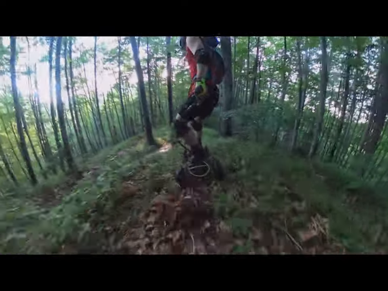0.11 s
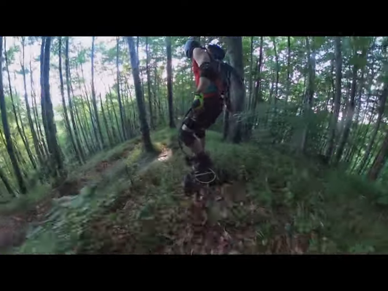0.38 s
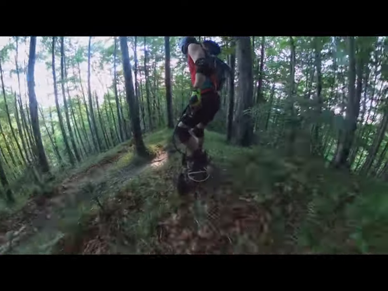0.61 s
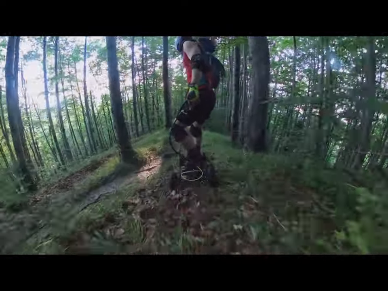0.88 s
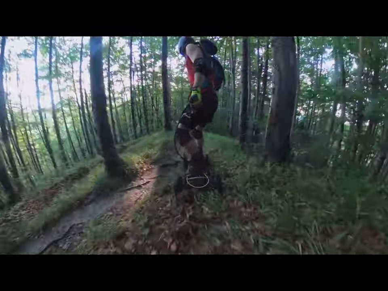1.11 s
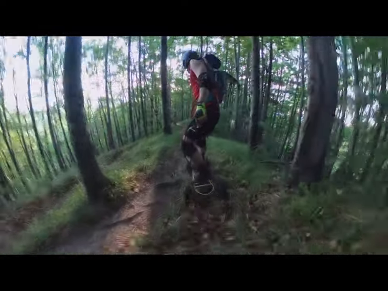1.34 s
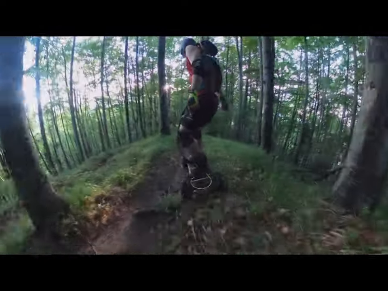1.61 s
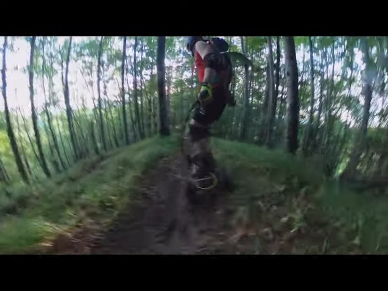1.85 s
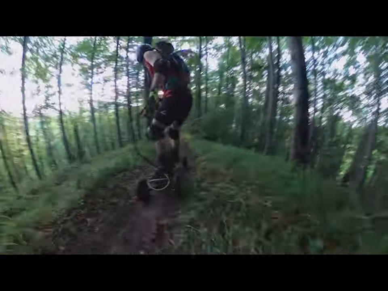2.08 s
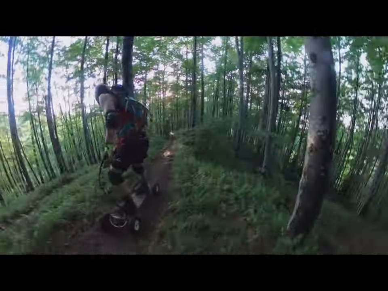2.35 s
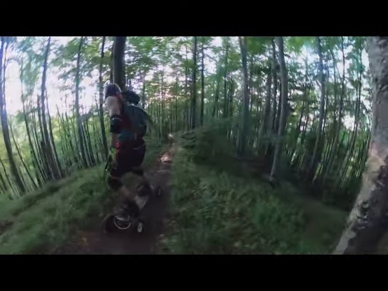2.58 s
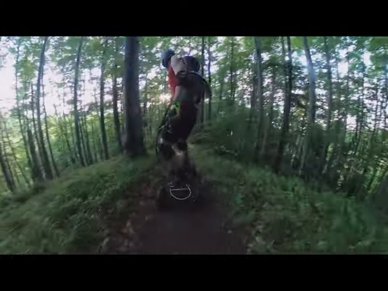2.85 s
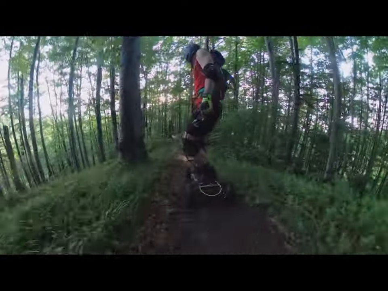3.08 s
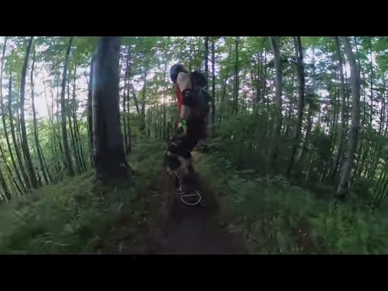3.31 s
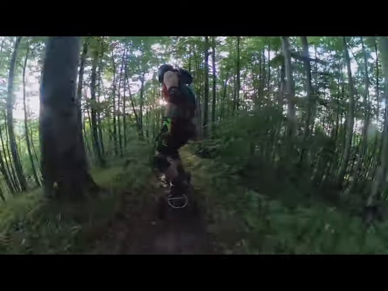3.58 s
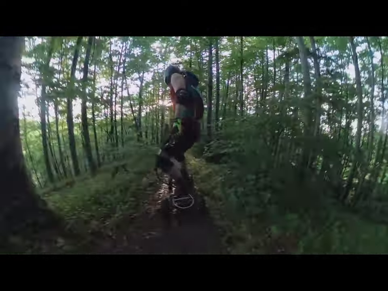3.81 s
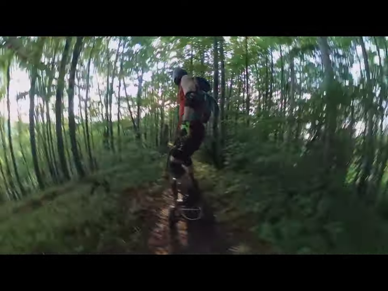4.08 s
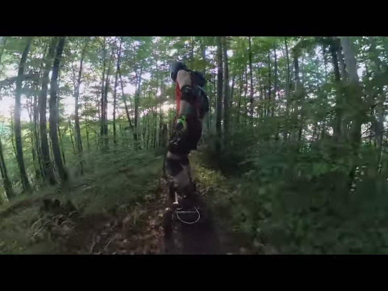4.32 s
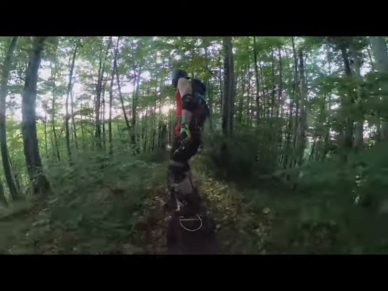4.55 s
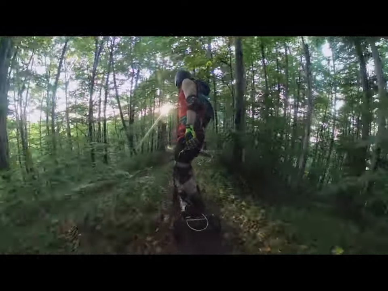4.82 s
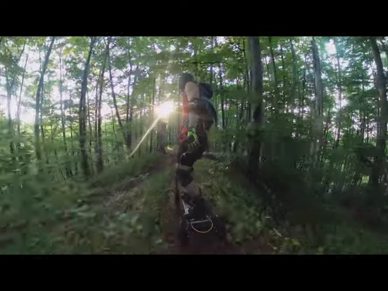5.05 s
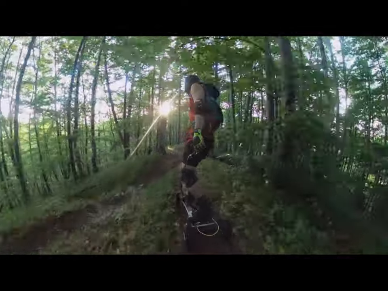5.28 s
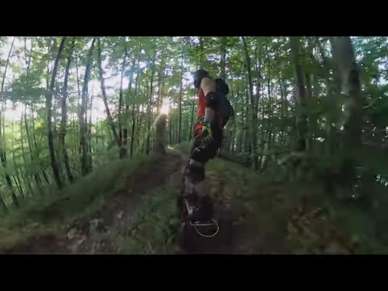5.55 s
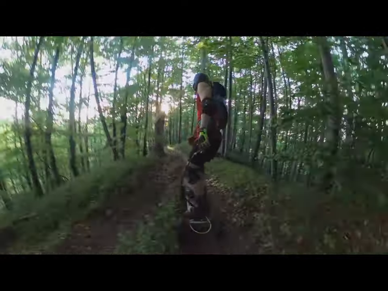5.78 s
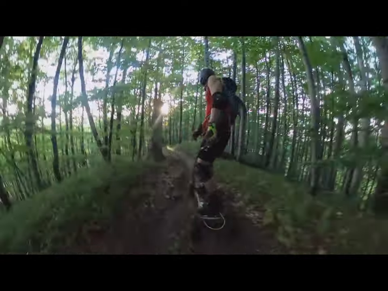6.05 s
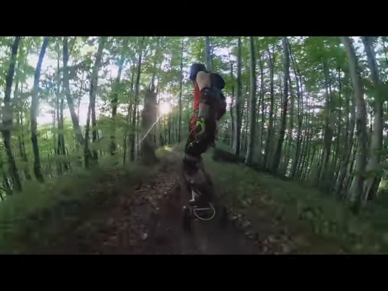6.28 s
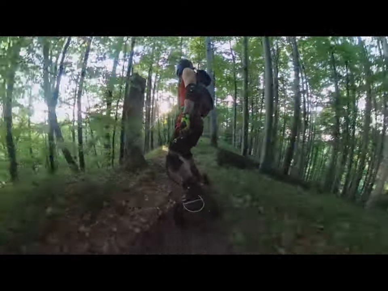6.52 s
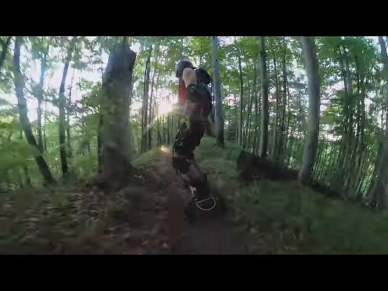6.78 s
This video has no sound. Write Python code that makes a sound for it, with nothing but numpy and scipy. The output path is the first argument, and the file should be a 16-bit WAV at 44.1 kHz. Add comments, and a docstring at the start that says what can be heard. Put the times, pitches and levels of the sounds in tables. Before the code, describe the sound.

Tyres rumble and crunch quickly over a damp leafy trail while wind thuds on the microphone and hard bumps knock hollowly.

```python
"""An all-terrain board rolls down a damp forest trail, heard from a small camera on a hand-held pole.
From the start noise-driven tyres hum and crunch leaves and grit under shaped wind noise and thin top hiss,
with a faint treble ring; knocks soon climb the pole as staggered modes. After a second gusts thud on the
microphone, filtered cracks snap and gliding tones ping; the hardest gust comes at 2.2 s. The knocks run on
to 4.4 s, pause for almost a second, and return as the hum grows towards the end."""
import sys
import numpy as np
from scipy import signal
from scipy.fft import rfft, irfft, next_fast_len
from scipy.io import wavfile
from scipy.ndimage import uniform_filter1d

SR = 44100
rng = np.random.default_rng(int(sys.argv[2]) if len(sys.argv) > 2 else 0)


def generate_wav(sig):
    """Save sig (samples, or channels by samples) to the path in sys.argv[1] as 16-bit PCM at SR."""
    pcm = np.round(np.clip(np.atleast_2d(sig).T, -1, 1) * 32767).astype(np.int16)
    wavfile.write(sys.argv[1], SR, pcm)


def boost(x):
    """Linear amplitude factor 10**(x/20) for a level x in decibels (scalar or array-like)."""
    u = np.asarray(x, float) / 20
    return 10 ** u


N = 304290  # samples

# tyres on the trail: (time [s], hum on dirt [dB], its upper part against it [dB], crunch of leaves and grit [dB])
TYRES = [(0, -43, 2, -46), (.4, -48, 3.5, -47.5), (.6, -47.5, 4.5, -47), (.87, -48.5, 4, -48.5),
         (1.3, -47.5, 4.5, -47.5), (1.65, -50, 4, -51), (2.0, -51, -0.5, -53.5), (2.25, -48.5, -3, -55),
         (2.47, -55.5, 1, -59.5), (2.9, -54.5, 4, -58), (3.2, -51.5, 0.5, -56), (3.55, -47, -2, -52.5),
         (3.9, -53.5, 4, -56), (4.25, -55, 1, -55.5), (4.6, -54, 0, -53), (5.0, -51, -1.5, -52.5),
         (5.25, -51, -1.5, -52), (5.36, -49, -1, -55.5), (5.46, -42, -7.5, -53.5), (5.65, -43, -4.5, -49),
         (5.82, -41, -1, -47), (5.95, -45, -1, -53), (6.3, -45.5, -2.5, -52), (6.9, -43, -1, -47)]
# bumps up the pole: (time [s], level [dB], weight of the low modes [dB], weight of the top modes [dB])
KNOCKS = [(0.132, -34, -4, -8), (0.145, -33, -5, -3), (0.165, -35, 7.5, -15), (0.201, -31, -1.5, -8),
          (0.237, -39, 4, -10), (0.247, -39, -3, -2), (0.294, -29.5, 1.5, -20), (0.351, -27, 1, -5.5),
          (0.362, -32, -0.5, -7), (0.374, -35, 0, -12), (0.634, -35, 4.5, -23), (0.701, -38, 3, -12),
          (0.897, -37, -6, -8), (0.921, -24, 4, -11), (0.937, -33, 3.5, -14), (1.048, -36, 11, 4),
          (1.261, -22, -3, -11), (1.268, -35, 6, -6), (1.281, -38.5, 9, -8), (1.343, -34, 0, -3),
          (1.414, -32.5, 4.5, -9), (1.493, -36.5, 7, -12), (1.579, -36.5, 4.5, -8), (1.7, -32, -0.5, -11),
          (1.719, -32, -9, -4), (1.734, -48, -4, -4), (1.751, -25, -3.5, -16), (1.765, -31.5, 7, -2.5),
          (1.777, -48, 4, -14), (1.873, -25, -2.5, -8), (1.883, -30, -8, -7), (1.894, -37, 3, -11),
          (1.903, -38, 5, -8), (1.918, -27.5, -2.5, -9), (1.927, -35, 7, -11), (1.962, -36, 5.5, -11),
          (1.99, -38.5, -2, 0), (2.235, -36, 3, -6), (2.283, -35.5, 10, -8.5), (2.339, -40, 0, -4),
          (2.376, -37.5, -1, -10), (2.549, -39, 2.5, -4.5), (2.907, -40, -8, -7), (2.983, -39, -4, -23),
          (3.001, -36, -8, -22), (3.034, -46, -2, -18), (3.074, -40.5, 2, -17), (3.145, -50, 8, -20),
          (3.181, -40, 4, -12), (3.192, -46, -12, -14), (3.235, -40, -16, -10), (3.297, -34, 2, -17),
          (3.307, -36, -5, -8), (3.358, -39.5, 4, -19), (3.398, -41.5, 8, -18), (3.439, -31, 5.5, -8),
          (3.503, -28.5, -3, -14), (3.538, -31.5, 2, -14), (3.588, -42.5, 8, -14), (3.623, -42, 3, -5),
          (3.66, -43, -1, -12), (3.71, -39, 0, -21), (3.73, -40, -8, -12), (3.769, -37.5, -11, -14),
          (3.808, -24.5, 2.5, -6.5), (3.869, -36, -10, -13), (3.885, -34, 0, -4), (3.985, -49, -10, -20),
          (4.003, -40.5, 10.5, -16), (4.017, -40.5, 2, -6), (4.034, -40, 4, -3), (4.051, -39, 5.5, -10),
          (4.078, -50, -6, -13), (4.136, -36, -17, -4), (4.175, -41, 3, -14), (4.255, -35, -11, -5),
          (4.363, -30, -6, -24), (5.285, -40.5, -7, -5), (5.408, -36.5, 3.5, -14), (5.43, -39.5, 5, -12),
          (5.468, -36, 1, -9), (5.485, -36.5, 0.5, -7), (5.505, -39, 5, -8), (5.575, -32.5, 3, -8),
          (5.636, -37.5, 2, 3), (6.491, -36, -11, 1)]
# modes of pole and housing: (frequency [Hz], relative level [dB], time to fall 60 dB [s])
POLE = [(96.3, -9, 0.067), (160.6, -13, 0.051), (300, -8, 0.036), (461, -10, 0.027), (604.6, -14, 0.039),
        (860.7, -13, 0.081), (1265.6, -9, 0.04), (1464, -31, 0.015), (1840, -9, 0.058),
        (2176, -13.5, 0.018), (2570, -13.5, 0.039), (3300, -35, 0.025)]


def line(table, column):
    """One column of a curve at every sample."""
    rows = np.array(table, float)
    return np.interp(np.arange(N) / SR, rows[:, 0], rows[:, column])


def unit(x):
    """Scale to rms 1."""
    return x / np.sqrt(np.mean(x ** 2))


def fading(t, t60):
    """Exponential decay that falls 60 dB in t60 seconds."""
    return np.exp(-np.log(1000) * t / t60)


def walk(rate):
    """Random levels held 1 / rate s and slewed twice, without slow drift; spread 1."""
    k = int(SR / rate)
    held = np.repeat(rng.standard_normal(N // k + 1), k)
    smooth = uniform_filter1d(uniform_filter1d(held, k), k)
    drift = uniform_filter1d(smooth, 5 * k)
    return unit((smooth - drift)[:N])


def bands(x, colour, count=2):
    """Split x into soft bands, count to the octave, weighted by the colour; yields (Hz, band)."""
    size = next_fast_len(N)
    octave = np.log2(np.arange(size // 2 + 1) * SR / size + 1)  # 1 Hz is added to avoid log of 0
    hz, db = np.transpose(colour)
    below = np.minimum(octave - np.log2(hz[0]), 0)
    # under the lowest point of the colour the spectrum falls 21 dB per octave
    spectrum = rfft(x, size) * boost(np.interp(octave, np.log2(hz), db) + 21 * below)
    for centre in np.arange(np.log2(hz[0]) - 1, np.log2(hz[-1]) + 1 / count, 1 / count):
        mask = np.cos(np.pi / 2 * np.clip((octave - centre) * count, -1, 1)) ** 2
        yield 2 ** centre, irfft(spectrum * mask, size)[:N]


def grit(rate, spread_db, burst_s):
    """Contacts at random moments, many small and few large, each a short fading burst of noise."""
    draw = rng.random((2, N))
    size = boost(np.minimum(-spread_db * np.log(1 - draw[1]), 12))
    hits = (draw[0] < rate / SR) * size
    envelope = signal.lfilter([1], [1, -np.exp(-1 / (burst_s * SR))], hits)
    return unit(envelope * rng.standard_normal(N))


def add(out, s, sound):
    """Mix a short sound in at time s."""
    i = int(s * SR)
    out[i:i + len(sound)] += sound[:max(N - i, 0)]


def scattered(count, db):
    """Random moments and levels: many faint, few stronger. Gives (s, dB, two spare draws of -0.5 to 0.5)."""
    draw = rng.random((count, 4))
    level_db = db - 2.5 * np.log(1 - .95 * draw[:, 1])
    return np.c_[draw[:, 0] * N / SR, level_db, draw[:, 2:] - .5]


def gusts():
    """Steady flow and gusts add in power, their reach weighted by it; gives (gain, reach dB, steady share)."""
    # steady air on the microphone: (time [s], level [dB], reach into the low mids [dB])
    steady_flow = [(0, -42, -4.5), (.3, -42.5, 0), (.86, -46, -4.5), (1.0, -41.5, -9), (1.6, -40, -6),
                   (2.06, -39.5, -1.5), (2.45, -37.5, -13.5), (2.63, -48, -0.5), (2.8, -30, -19.5),
                   (3.08, -32.5, -14), (3.15, -51.5, 0), (3.5, -41, -3.5), (3.65, -34, -10), (4.4, -35, -9),
                   (4.65, -35, -9), (4.9, -35, -9), (5.2, -49.5, 2.5), (5.4, -36.5, -6), (5.7, -39.5, -1.5),
                   (6.2, -41, 1), (6.3, -37, -5), (6.5, -37.5, -5), (6.63, -41.5, -6.5), (6.9, -35, -3.5)]
    # gusts that thud on it: (time of the peak [s], half length [s], level [dB], reach into the low mids [dB])
    gust_list = [(0.955, 0.024, -41, 0), (1.045, 0.026, -34.5, -3), (1.122, 0.021, -34, -21),
                 (1.209, .02, -39, -13), (1.296, 0.029, -35.5, 2.5), (1.527, 0.027, -42, -4),
                 (1.732, 0.023, -30, -6.5), (2.133, 0.035, -25, -7), (2.212, 0.035, -16, -6.5),
                 (2.306, 0.043, -28.5, -9), (2.423, 0.029, -34, -10), (2.76, 0.022, -37.5, -12),
                 (2.82, 0.019, -30, -8), (2.874, 0.021, -25.5, -18), (2.972, 0.028, -24.5, -10),
                 (3.009, 0.025, -30, -4), (3.057, 0.023, -33, -11.5), (3.33, 0.037, -40.5, -8),
                 (3.596, 0.045, -34, -14), (3.838, 0.01, -28, -10), (3.879, 0.027, -27, -2),
                 (4.035, 0.018, -23.5, -14.5), (4.15, 0.018, -30.5, -2), (4.21, 0.022, -31, -5.5),
                 (4.283, 0.032, -30.5, -6), (4.617, 0.043, -34, -14), (4.748, 0.022, -32, -11),
                 (4.985, 0.014, -28.5, -11), (5.086, 0.05, -32.5, -7), (5.221, 0.0087, -33, -7),
                 (5.33, .015, -37, -10), (5.389, .02, -32, -14), (5.455, .015, -31, -8),
                 (5.477, 0.019, -26, -7.5), (5.537, 0.014, -33, 1), (5.909, 0.027, -34.5, -5.5),
                 (6.29, 0.033, -32.5, -6.5), (6.362, 0.024, -26.5, -2.5), (6.445, .012, -34.5, -6),
                 (6.49, 0.011, -36, -4), (6.753, 0.068, -35, -4), (6.9, 0.028, -28, -10)]
    eddy_db, eddies_per_s = 2, 19  # small eddies stir the steady level
    shoulder = 3.2  # how square the shoulders of a gust are
    t = np.arange(N) / SR
    power = boost(line(steady_flow, 1) + eddy_db * walk(eddies_per_s)) ** 2
    steady, reach = power.copy(), power * line(steady_flow, 2)
    for s, half, db, reach_db in gust_list:
        i = slice(max(int((s - 4 * half) * SR), 0), int((s + 4 * half) * SR))
        bump = boost(db) ** 2 * np.exp(-np.abs((t[i] - s) / half) ** shoulder)
        power[i] += bump
        reach[i] += bump * reach_db
    return np.sqrt(power), reach / power, steady / power


def wind():
    """Eddies press on the diaphragm: low noise whose upper bands follow the reach of the flow and flutter."""
    # colour of the rumble: (frequency [Hz], relative spectral level [dB])
    wind_colour = [(20, 4.5), (45, 1.5), (70, -1), (115, -5.5), (170, -9.5), (260, -15.5), (380, -23),
                   (600, -31.5), (800, -53), (1200, -53)]
    usual_reach_db = -6.5  # the reach at which the colour holds
    lump_db, lumps_per_s = 2, 19  # the rumble above the deepest part comes in uneven lumps
    deep_lift_db, deep_swing_db = 1.2, 3.5  # steady lift and random swing of the deepest part
    deep_lag, strong_gust_db = 0.47, -33  # dB the deepest part is held back per dB of gain above this level
    gain, reach_db, calm = gusts()
    # inside gusts the random swings are reduced and the deepest part is held back, so the level curve governs
    excess_db = np.maximum(20 * np.log10(gain) - strong_gust_db, 0)
    deep_db = deep_lift_db + deep_swing_db * calm * walk(9.3) - deep_lag * excess_db
    flutter, lumps = calm * walk(30), calm * walk(lumps_per_s)
    out = 0
    for hz, band in bands(rng.standard_normal(N), wind_colour):
        # eddies follow one another closely, so each band keeps a fairly even size over a few cycles
        local = uniform_filter1d(band ** 2, int(3 * SR / hz)) / np.mean(band ** 2)
        evened = band * (np.abs(local) + 0.46) ** -.35
        high = np.clip(np.log2(hz / 90), 0, 1.1)
        deep = np.clip(np.log2(70 / hz) / 1.17, 0, 1)
        high_db = high * (reach_db - usual_reach_db + 2.8 * flutter)
        out = out + evened * boost(high_db + deep * deep_db + lump_db * (1 - deep) * lumps)
    # the whole is evened over 60 ms, more so inside gusts
    power = uniform_filter1d(unit(out) ** 2, int(.06 * SR))
    return unit(out * (np.abs(power) + 0.12) ** (-.15 - .25 * (1 - calm))) * gain


def top_hiss(patch):
    """A smooth thin hiss at the very top, of noise in flickering bands; its top treble fades and returns."""
    # course of the hiss: (time [s], level [dB], top treble against it [dB])
    hiss_curve = [(0, -62, -6), (1.3, -64, -6), (2.0, -68, -8), (2.2, -69, -15), (2.3, -71, -23),
                  (2.47, -87, -25), (2.75, -73, -29), (3.0, -73.5, -24), (3.5, -73, -21), (3.9, -70.5, -21),
                  (4.3, -71, -9), (4.42, -66, -13), (5.5, -75, -2), (5.8, -64.5, -19), (6.1, -74, -11),
                  (6.7, -65, -23), (6.9, -61, -13)]
    # colour of the hiss: (frequency [Hz], relative spectral level [dB])
    hiss_colour = [(7000, 7), (9000, -0.5), (10500, 2.5), (12500, 1), (15500, -7)]
    usual_treble_db = -1.5  # the top treble at which the colour holds
    treble_db, flicker, out = line(hiss_curve, 2), walk(29), 0
    for hz, band in bands(rng.standard_normal(N), hiss_colour, count=4):
        treble_share = np.clip(np.log2(hz / 10500) / 0.52, 0, 1.5)
        stir_db = 0.92 * flicker + 0.95 * patch + 0.65 * walk(4.8)
        out = out + band * boost(stir_db + (treble_db - usual_treble_db) * treble_share)
    return unit(out) * boost(line(hiss_curve, 1))


def ring():
    """A faint thin ring: noise through a narrow treble resonance, coming and going."""
    # level of the ring: (time [s], level [dB])
    ring_curve = [(0, -73), (2, -71), (2.6, -69.5), (3.3, -70), (4, -72), (5.5, -73), (6.2, -67),
                  (6.9, -66)]
    ring_hz, width_hz = 7390, 120
    narrow = signal.iirpeak(ring_hz, ring_hz / width_hz, fs=SR)
    tone = signal.lfilter(*narrow, rng.standard_normal(N))
    return unit(tone * boost(3.1 * walk(10))) * boost(line(ring_curve, 1))


def pings():
    """Small stones ping off metal parts: short scratchy tones that swell, slide up a little and fade."""
    # stones on metal: (time [s], level [dB], pitch [Hz], time to fall 60 dB [s])
    ping_list = [(1.046, -29, 1730, 0.013), (1.047, -23.5, 2420, 0.0072), (1.047, -41, 7140, 0.017),
                 (3.255, -35.5, 3400, 0.012), (4.09, -50, 1280, 0.044), (4.933, -43.5, 2000, 0.046),
                 (5.288, -44.5, 1400, .03), (5.421, -40.5, 2900, 0.03), (5.698, -42, 6100, 0.03),
                 (6.275, -37.5, 2670, 0.05), (6.275, -42.5, 3860, 0.046), (6.533, -37, 850, 0.025),
                 (6.809, -35, 1240, 0.063)]
    out, t = np.zeros(N), np.arange(int(.1 * SR)) / SR
    noise = rng.standard_normal((len(ping_list), len(t)))
    chance = uniform_filter1d(noise, 40, axis=1) * np.sqrt(40)
    for (s, db, hz, t60), stagger in zip(ping_list, chance):
        swell = (1 - np.exp(-t / (0.07 * t60))) ** 2 * fading(t, t60)
        pitch = hz * (1 + .06 * stagger + .1 * (t / t60 - .2))
        tone = np.sin(2 * np.pi * np.cumsum(pitch) / SR)
        add(out, s, boost(db) * swell / swell.max() * tone)
    return out


def snaps():
    """Twigs and grit snap: broad, sudden cracks that die in hundredths of a second; the housing dulls their top."""
    # snaps near the board: (time [s], level [dB], centre [Hz], time to fall 60 dB [s])
    snap_list = [(1.046, -25.5, 2300, 0.029), (1.1495, -40, 4500, 0.03), (1.345, -35, 3950, 0.028),
                 (1.53, -34.5, 1820, 0.037), (1.871, -32, 1830, 0.031), (1.8903, -29, 2030, 0.025),
                 (1.998, -37, 4260, 0.028), (2.005, -42, 7000, .015), (2.04, -37, 6000, .015),
                 (2.158, -41, 6000, .015), (2.234, -45, 4700, .015), (2.2477, -35.5, 3530, 0.03),
                 (2.405, -43, 3000, .015), (2.288, -36, 2620, 0.015), (3.255, -35, 3300, 0.022),
                 (3.335, -47, 3500, 0.014), (3.496, -34.5, 3820, 0.015), (3.533, -32.5, 3420, 0.035),
                 (4.11, -40, 3500, .015), (4.15, -38, 4800, 0.036), (4.256, -45, 2500, .015),
                 (4.3788, -37.5, 4120, 0.042), (4.695, -47, 2800, 0.025), (5.35, -38, 2770, 0.046),
                 (5.425, -41, 2900, .025), (5.697, -39, 5760, 0.016), (6.4358, -35, 3650, 0.025),
                 (6.5756, -35, 3040, 0.028), (6.644, -38, 2600, 0.02), (6.6705, -32.5, 2800, 0.03)]
    small_db, small_hz, small_t60_s = 7.5, 2980, 0.039  # random snaps: least dB over the crunch, middle Hz and t60
    # fine treble thrown off by a hard snap; it falls spray_slope dB per dB of weaker snap
    spray_db, spray_slope, hard_snap_db = -54, 5.6, -28
    out, spray, t = np.zeros(N), np.zeros(N), np.arange(int(.05 * SR)) / SR
    crunch_db = line(TYRES, 3)
    small = [(s, db + crunch_db[int(s * SR)], small_hz * 2 ** (1.25 * a), small_t60_s * 2 ** b)
             for s, db, a, b in scattered(count=30, db=small_db)]
    chance = rng.standard_normal((len(snap_list) + len(small), len(t)))
    hard_break = 1.5 * (np.arange(len(t)) == 40)  # one hard break amid the splinters
    for (s, db, hz, t60), noise in zip(snap_list + small, chance):
        wide = signal.butter(2, [hz / 1.6, hz * 1.7], "bandpass", fs=SR, output="sos")
        fade = (1 - np.exp(-t / 0.0011)) * fading(t, max(t60, .005))
        crack = fade * signal.sosfilt(wide, noise + hard_break)
        add(out, s, boost(db) * crack / np.abs(crack).max())
        add(spray, s, boost(spray_db + spray_slope * (db - hard_snap_db)) * fade * noise)
    dull = signal.butter(3, 7200, fs=SR, output="sos")
    treble = signal.butter(2, [8000, 14500], "bandpass", fs=SR, output="sos")
    return signal.sosfilt(dull, out) + signal.sosfilt(treble, spray)


def crunch(patch):
    """Leaves and grit crushed under the tyres: broad crackle in patches, small grains each in their own band."""
    # the crunch turns brighter and duller with the ground: (time [s], lift near 6 kHz [dB])
    bright_curve = [(0, -1.5), (1, -2), (1.9, 1), (2.1, 2), (2.6, 6.5), (3.2, 1.5), (4, 2.5), (4.7, 1.5),
                    (5.3, -5), (6, -2.5), (6.9, -1)]
    # colour of the crunch: (frequency [Hz], relative spectral level [dB])
    crunch_colour = [(1000, -20), (1800, -8.5), (2600, -3), (4500, -3), (6000, -5.5), (7800, -15.5),
                     (8800, -22), (12000, -38)]
    out, bright_db = 0, line(bright_curve, 1)
    drive = rng.standard_normal(N) + .5 * grit(120, 2.1, 0.0094)
    for hz, band in bands(drive, crunch_colour, count=3):
        grains = 1 + 0.41 * np.abs(uniform_filter1d(np.abs(grit(70, 4, 0.008)), 90))
        lift_db = bright_db * np.exp(-(np.log2(hz / 5800) / 0.24) ** 2)
        out = out + band * grains * boost(1.44 * patch + .7 * walk(7.4) + lift_db)
    return unit(out) * boost(line(TYRES, 3))


def jolts():
    """Each bump shakes the board: a gain for the hum that jumps and fades."""
    jolt_db, jolt_t60_s = -14, 0.1  # jump against the level of the knock, and its fading
    kicks = np.zeros(N)
    for s, db, _, _ in KNOCKS:
        kicks[int(s * SR)] = boost(db + jolt_db)
    decay = np.exp(-np.log(1000) / (jolt_t60_s * SR))
    return uniform_filter1d(signal.lfilter([1], [1, -decay], kicks), 200)


def hum():
    """Tread knobs and small bumps shake the board: noise with lumps, duller on soft ground."""
    # colour of the hum: (frequency [Hz], relative spectral level [dB])
    hum_colour = [(120, -21), (300, -3), (600, -6.5), (860, -7.5), (1050, -8.5), (1250, -8.5), (1550, -10),
                  (2200, -17.5), (3500, -20)]
    usual_upper_db = 2.5  # the upper part at which the colour holds
    shake, upper_db = walk(18), line(TYRES, 2) + 0.41 * walk(20)
    drive = rng.standard_normal(N) + 0.76 * grit(400, 4.8, 0.0022)
    out = 0
    for hz, band in bands(drive, hum_colour, count=3):
        share = np.clip(np.log2(hz / 700), 0, 1)
        out = out + band * boost(share * (upper_db - usual_upper_db) + 0.53 * shake + walk(11))
    return unit(out) * np.hypot(boost(line(TYRES, 1)), jolts())


def knock(chance, low_db, top_db):
    """Bending waves climb the pole: each mode swells and fades, the lower the later, roughened by rattling joints."""
    chatter_db, chatter_s = 3, 0.0022  # loose joints chop the upper modes into crackles: depth and length
    hz, db, t60 = np.transpose(POLE)[:, :, None]
    t = np.arange(chance.shape[-1]) / SR
    db = db + low_db * (hz < 700) + top_db * (hz > 1600) + 2.26 * chance[0, :, :1]
    rise = 0.0023 * (1250 / hz) ** 0.58
    swell = (1 - np.exp(-t / rise)) ** 2 * fading(t, t60)
    # the pitch of each mode staggers as the joints open and close
    stagger = uniform_filter1d(chance[1], 60, axis=1) * np.sqrt(60)
    turns = np.cumsum(hz * (1 + 0.1 * stagger), axis=1) / SR
    tone = np.sin(2 * np.pi * turns + np.pi * chance[0, :, 1:2])
    span = max(int(chatter_s * SR), 1)
    smooth = uniform_filter1d(uniform_filter1d(chance[0, 0], span), span)
    db = db + chatter_db * np.clip(unit(smooth), -2, 1) * (hz > 700)
    return np.sum(boost(db) * swell / swell.max(axis=1, keepdims=True) * tone, axis=0)


def knocks():
    """Clear and little bumps, each shaking the same pole a little differently."""
    small_db, small_top_db, small_spread_s = -52.5, -6, .2  # least level, middle top weight, spread either way
    out = np.zeros(N)
    # little bumps crowd round every third clear one
    near = np.resize(np.array(KNOCKS)[::3, 0], 24)
    small = []
    for s_near, (s, db, a, b) in zip(near, scattered(count=24, db=small_db)):
        moment = s_near + small_spread_s * (2 * s * SR / N - 1)
        small.append((max(moment, 0), db, 16 * a, small_top_db + 12 * b))
    # two rows of draws for every mode of every knock
    chance = rng.standard_normal((len(KNOCKS) + len(small), 2, len(POLE), int(.1 * SR)))
    for (s, db, low_db, top_db), c in zip(KNOCKS + small, chance):
        add(out, max(s - .003, 0), boost(db) * knock(c, low_db, top_db))  # the swell starts 3 ms ahead
    return signal.sosfilt(signal.butter(4, 5000, fs=SR, output="sos"), out)


def scene():
    """All sources on one microphone; crunch and top hiss swell in the same patches."""
    patch = walk(20)
    background = wind() + top_hiss(patch) + ring()
    debris = pings() + snaps() + crunch(patch)
    board = hum() + knocks()
    return (background + debris + board)[None]


def low_pass(x):
    """Removes everything above the highest recorded frequency."""
    return signal.sosfilt(signal.butter(12, 15700, fs=SR, output="sos"), x)


def record(dry):
    """The microphone's mix is already finished and is handed on."""
    return low_pass(dry)


dry = scene()
out = record(dry)
generate_wav(out)
```